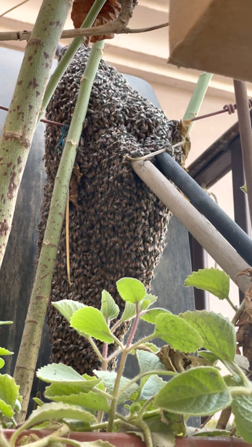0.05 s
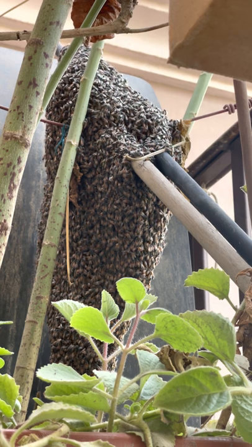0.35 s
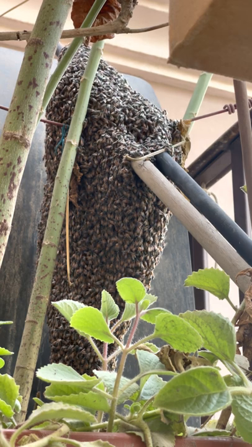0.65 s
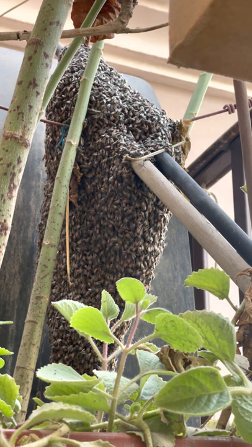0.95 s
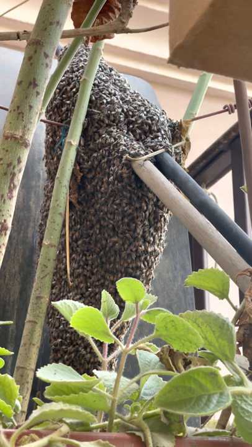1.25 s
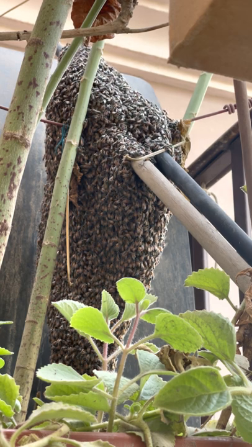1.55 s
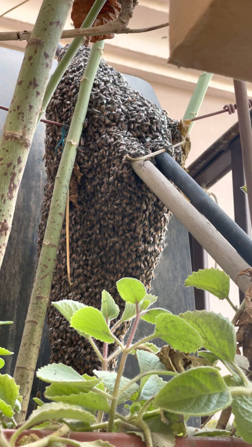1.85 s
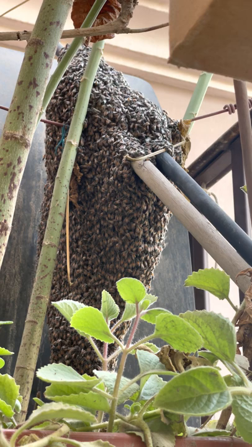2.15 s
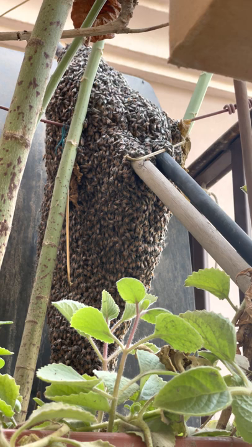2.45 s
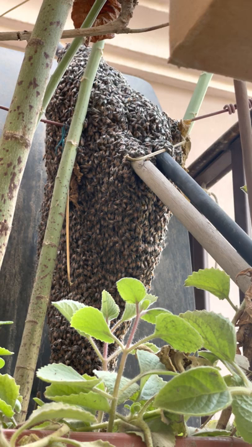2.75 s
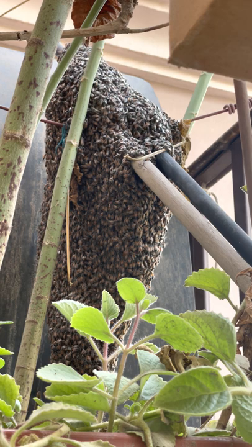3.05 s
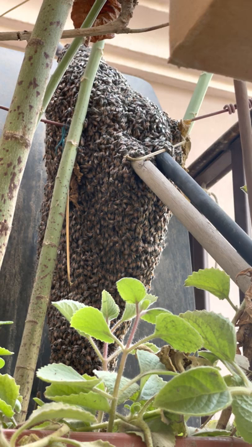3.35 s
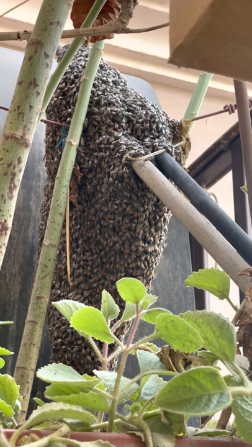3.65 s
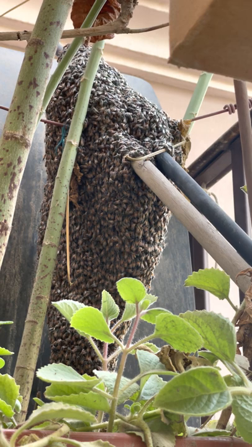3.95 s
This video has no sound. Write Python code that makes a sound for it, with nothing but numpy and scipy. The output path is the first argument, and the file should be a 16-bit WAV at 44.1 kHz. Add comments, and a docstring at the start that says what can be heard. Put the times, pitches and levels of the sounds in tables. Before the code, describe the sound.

Soft rippling wing flicks from a bee cluster, over small bird chirps and low rumble.

```python
"""A cluster of bees on its comb in a walled garden, heard through a two-port stereo microphone.
About twice a second a wave of wing flicks, thousands of tiny clicks, ripples over it with a soft hiss.
Farther off, small birds chip and slur, their trilled notes smeared by leaves and walls.
Behind them lie town rumble, a distant engine's drone and the faint hum of a motor."""
import sys
import numpy as np
from scipy import signal
from scipy.fft import rfft, irfft
from scipy.io import wavfile
from scipy.ndimage import uniform_filter1d

SR = 44100
rng = np.random.default_rng(int(sys.argv[2]) if len(sys.argv) > 2 else 0)


def wav_out(sig):
    """Save sig, one row per channel (or a flat mono array), as 16-bit PCM at SR to the path in sys.argv[1]."""
    wavfile.write(sys.argv[1], SR, np.round(np.clip(np.atleast_2d(sig).T, -1, 1) * 32767).astype(np.int16))


N = 176400
TIME_S = np.arange(N) / SR
BIN_HZ = np.arange(N // 2 + 1) * SR / N


def bees():
    """Each wave of wing flicks swells, sags and dies away; the cluster crawls on between waves."""
    # waves over the comb: start_s, attack_s, length_s, level_db
    waves = [(0.079, 0.105, 0.22, -50), (0.505, 0.078, 0.18, -49.5), (1.1, 0.08, 0.18, -49.5),
             (1.567, 0.071, 0.22, -50.5), (1.969, 0.11, 0.23, -50), (2.54, 0.1, 0.23, -49.5),
             (3.254, 0.15, 0.25, -48), (3.942, 0.1, 0.2, -48)]
    # tone of the hiss, its crisp top and the quiet crawl as heard, with a gap near 10 kHz:
    # frequency_hz, relative_db
    hiss_tone = [(2000, -13), (3400, 0), (4300, -2), (4900, -2.5), (5500, -0.5), (6900, 1), (7500, -4.5),
                 (8300, 3.5), (10000, -38), (12000, -7), (13500, -3), (15500, -14)]
    snap_tone = [(3000, -12.5), (5000, 12), (6000, 21), (8300, 15), (10000, -14), (11800, -9.5),
                 (13200, 22), (14500, 15.5), (15600, -13.5)]
    crawl_tone = [(1500, -8), (2500, -6.5), (2900, 1.5), (3550, -2.5), (4050, -5), (4450, -2), (4900, -3.5),
                  (5200, -5.5), (5750, -3.5), (6500, -7), (7300, -12), (8000, -9.5), (10000, -22),
                  (12000, -13), (13500, -15.5), (15600, -17.5)]
    # wing resonances, the highest trailing most: centre_hz, width_hz, relative_db, lag_s
    resonances = [(4470, 640, -8.5, .002), (5650, 830, -7, 0.0045), (6310, 760, -7.5, .006),
                  (6920, 590, -10, 0.018)]
    sag_db_per_s, release_s, snap_fade_s = 24.5, 0.085, 0.074
    body, front = np.zeros(N), np.zeros(N)
    for start, attack, length, db in waves:
        age = np.maximum(TIME_S - start, 0)
        rise = undb(db) * np.sin(np.pi / 2 * np.minimum(age / attack, 1)) ** 2
        past_peak = np.maximum(age - attack, 0)
        release = np.exp(-np.maximum(age - length, 0) / release_s)
        body += rise * undb(-sag_db_per_s * past_peak) * release
        front += rise * np.exp(-past_peak / snap_fade_s)
    ripple = undb(0.46 * wander(rate_hz=44))
    hiss = undb(-9) * body * colour(spread(flicks, side_db=-28.5), hiss_tone)
    for hz, width, db, lag in resonances:
        swell = delayed(body, lag) * undb(db + 2 * wander(rate_hz=35))  # each flutters on its own
        hiss += swell * resonate(spread(flicks, side_db=-15), hz, width)
    snap = undb(-15) * front * colour(spread(flicks, side_db=-25), snap_tone)
    crawl = undb(-62) * colour(spread(flicks, side_db=-31.5), crawl_tone)
    return ripple * (hiss + snap) + crawl


def flicks(per_s=6500):
    """Dense tiny clicks of wings and legs, a few stronger than the rest."""
    return (rng.random(N) < per_s / SR) * rng.standard_normal(N)


def birds():
    """Notes come through the leaves and ring on in the garden; chips also echo off the nearest walls."""
    # short falling chips: start_s, top_pitch_hz, level_db
    chip_notes = [(0.27, 6100, -53.5), (.862, 6174, -48.5), (1.18, 6220, -55), (1.852, 6080, -50),
                  (2.491, 6010, -47), (3.078, 6110, -47.5), (3.731, 6390, -54)]
    # slurs and short notes, mostly falling: start_s, length_s, from_hz, to_hz, level_db, trill_share
    slur_notes = [(0.936, 0.068, 4410, 3800, -62.5, 0.091), (1.466, 0.093, 5420, 3260, -59, .08),
                  (1.925, .05, 4190, 3890, -65, .06), (2.018, 0.066, 4500, 3170, -58, 0.094),
                  (2.801, 0.055, 4720, 3800, -56, .07), (2.865, 0.021, 3050, 3250, -52.5, 0.026),
                  (2.891, 0.025, 3165, 2962, -58.5, 0.024), (3.165, 0.087, 4200, 3950, -62.5, 0.058),
                  (3.276, 0.047, 4930, 4800, -56, .025), (3.327, 0.032, 4148, 3987, -49, 0.027),
                  (3.366, 0.052, 4140, 3940, -52, .06), (3.736, 0.018, 5380, 5340, -51.5, .01),
                  (3.79, 0.044, 5480, 5360, -56, .01), (3.857, 0.064, 4820, 3835, -59, .08)]
    # single echoes off the nearest walls: delay_s, gain_db
    wall_echoes = [(.045, -16), (.093, -10)]
    leaves_t60_s, walls_t60_s = .06, .72
    chips = sum(bird_note(start, length_s=.03, from_hz=hz, to_hz=.84 * hz, db=db, trill_share=.032)
                for start, hz, db in chip_notes)
    slurs = sum(bird_note(*note) for note in slur_notes)
    echoes = sum(undb(db) * scatter(delayed(chips, delay), leaves_t60_s) for delay, db in wall_echoes)
    garden = undb(1) * scatter(delayed(chips, delay_s=.03) + undb(1) * slurs, walls_t60_s)
    through_leaves = undb(-2.5) * scatter(chips + slurs, leaves_t60_s)
    return through_leaves + echoes + garden


def bird_note(start_s, length_s, from_hz, to_hz, db, trill_share, trill_hz=330):
    """One note that glides ever faster; a rapid, uneven trill of pitch and level makes it buzz."""
    progress = np.clip((TIME_S - start_s) / length_s, 0, 1)
    trill = phase(trill_hz * (1 + .3 * wander(trill_hz)))
    glide_hz = from_hz * (to_hz / from_hz) ** (progress ** 1.5)
    warble = .025 * wander(rate_hz=900)
    pitch_hz = glide_hz * (1 + trill_share * np.sin(trill) + warble)
    envelope = undb(db) * np.sqrt(2 * np.abs(np.sin(np.pi * progress)))
    return envelope * (1 + .4 * np.cos(trill)) * np.sin(phase(pitch_hz))


def scatter(x, t60_s):
    """A dense spray of reflections that dies away, slightly different left and right."""
    decay = undb(-60 * TIME_S[:SR] / t60_s)
    tail = spread(lambda: rng.standard_normal(SR), side_db=-13) * decay
    return signal.fftconvolve(x[None], tail / np.sqrt(np.sum(tail ** 2) / 2), axes=1)[:, :N]


def town():
    """Far rumble that swells a little; the bass is the same left and right."""
    # spectrum of the rumble: frequency_hz, relative_db
    rumble_spectrum = [(15, -56), (25, -10), (35, -14.5), (50, -2), (106, -1.5), (168, -8), (196, -5.5),
                       (221, -10.5), (294, -14), (357, -15.5), (409, -17), (441, -25), (515, -22),
                       (662, -27), (991, -29.5), (1320, -33.5), (2500, -39), (3250, -65.5), (5500, -120)]
    # stereo width, as side against mid: frequency_hz, side_db
    stereo_width = [(70, -59.5), (130, -52), (220, -23.5), (330, -12), (480, 0.5), (700, -2.5), (1400, -3),
                    (2000, -12.5)]
    mid, side = rfft(rng.standard_normal((2, N)))
    pair = irfft(mid + side * undb(over_hz(stereo_width)) * np.array([[1], [-1]]), N)
    return undb(-37.5 + .4 * wander(rate_hz=4.63)) * colour(pair, rumble_spectrum)


def engine():
    """A distant engine drones, drops away and returns."""
    # course of the drone: time_s, pitch_hz, level_db
    drone = [(0, 59.3, -34), (.35, 59.5, -43.5), (.47, 61.14, -34), (.9, 62.05, -36), (1.1, 60.7, -36.5),
             (1.35, 62.96, -44), (1.6, 66, -32.5), (1.85, 63.6, -39), (2.039, 64.4, -43),
             (2.15, 64.7, -48.5), (2.9, 65.96, -57), (3.12, 68.4, -35), (3.42, 66.4, -54), (3.8, 59, -45),
             (4, 65.5, -46)]
    times, pitch_hz, level_db = np.array(drone).T
    hz, db = np.interp(TIME_S, times, pitch_hz), np.interp(TIME_S, times, level_db)
    return machine_tone(hz, db, drift_share=0.0256, flutter_db=0.3)


def motor():
    """A motor hums and whines faintly throughout."""
    # partials of the low hum: pitch_hz, level_db
    hum_partials = [(98, -48.5), (121, -52.5), (147, -55.5), (195, -53.5), (292, -59.5), (410, -64),
                    (435, -67.5), (532, -75.5), (626, -65.5)]
    # partials of the thin whine: pitch_hz, relative_db
    whine_partials = [(969.0, -68.5), (1066, -66.5), (1265, -69), (1459, -74), (1744, -81), (1793, -73),
                      (2821, -72), (3548, -78), (3854, -80.5), (4032, -97), (4161, -77)]
    hum = sum(machine_tone(hz, db, drift_share=0.007044, flutter_db=3) for hz, db in hum_partials)
    whine = sum(machine_tone(hz, db, drift_share=0.000984, flutter_db=2) for hz, db in whine_partials)
    return hum + undb(-2) * whine


def machine_tone(hz, db, drift_share, flutter_db):
    """A sine tone, slightly unsteady in level and pitch."""
    amplitude = np.sqrt(2) * undb(db + flutter_db * wander(rate_hz=8.2))
    return amplitude * np.sin(phase(hz * (1 + drift_share * wander(rate_hz=6))))


def undb(db):
    return 10 ** (np.asarray(db) / 20)


def unit_rms(x):
    return x / np.sqrt(np.mean(x ** 2))


def phase(hz):
    return 2 * np.pi * np.cumsum(hz) / SR


def delayed(x, delay_s):
    return np.interp(TIME_S - delay_s, TIME_S, x)


def over_hz(table):
    """A table read at every bin on a log-frequency axis."""
    hz, values = np.array(table, float).T
    return np.interp(np.log(BIN_HZ + 1), np.log(hz), values)


def colour(x, spectrum):
    """Give a sound a spectrum that falls away steeply beyond its ends; rms 1."""
    hz = BIN_HZ + 1
    skirts = 1 / np.sqrt(1 + (spectrum[0][0] / hz) ** 8 + (hz / spectrum[-1][0]) ** 12)
    return unit_rms(irfft(rfft(x) * undb(over_hz(spectrum)) * skirts, N))


def resonate(x, hz, width_hz):
    """One steep resonance; rms 1."""
    return unit_rms(irfft(rfft(x) / (1 + (2 * (BIN_HZ - hz) / width_hz) ** 2), N))


def wander(rate_hz):
    """Random steps, smoothed twice; rms 1."""
    hold = max(int(SR / rate_hz), 1)
    steps = np.repeat(rng.standard_normal(N // hold + 1), hold)
    return unit_rms(uniform_filter1d(uniform_filter1d(steps, hold), hold)[:N])


def spread(draw, side_db):
    """A stereo pair from a shared draw and a weaker opposed one."""
    return draw() + undb(side_db) * draw() * np.array([[1], [-1]])


def scene():
    """The garden, from the far town in to the comb."""
    return town() + engine() + motor() + birds() + bees()


def record(dry):
    """The microphone's two ports hear the treble out of step; the deepest bass and the top are cut."""
    # phase by which the left port leads the right: frequency_hz, lead_rad
    port_lead = [(1500, 0), (4000, .5), (4750, 1.1), (5250, 0), (6500, .8), (8000, 2.1), (9300, 2.95),
                 (10800, 3.3), (12000, 4.1), (14500, 5.5)]
    low_cut_hz, top_hz = 35.6, 15500
    lead = over_hz(port_lead)
    soft_ends = signal.windows.tukey(N, .003)
    pair = irfft(rfft(dry * soft_ends) * np.exp(1j * np.array([lead, -lead]) / 2), N)
    pair = signal.sosfilt(signal.butter(4, low_cut_hz, "high", fs=SR, output="sos"), pair)
    return signal.sosfilt(signal.ellip(10, .2, 80, top_hz, fs=SR, output="sos"), pair)


dry = scene()
out = record(dry)
wav_out(out)
```